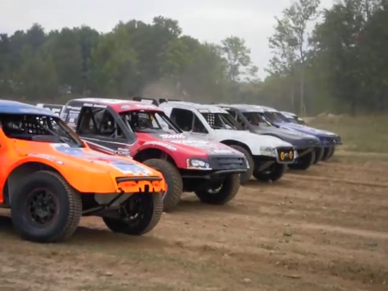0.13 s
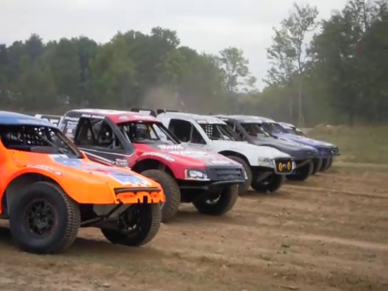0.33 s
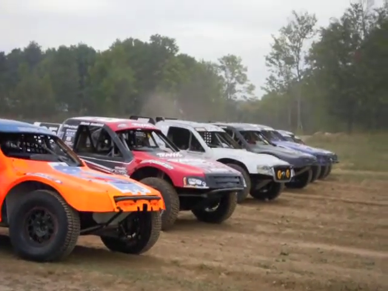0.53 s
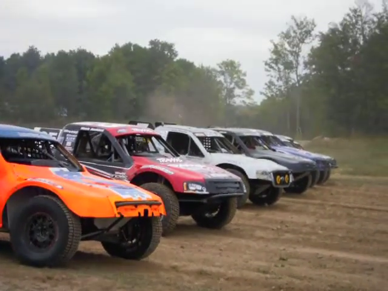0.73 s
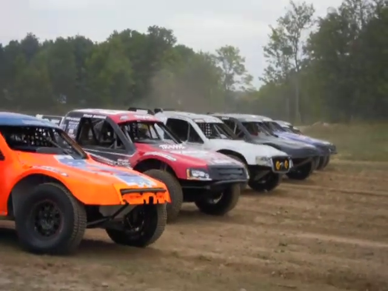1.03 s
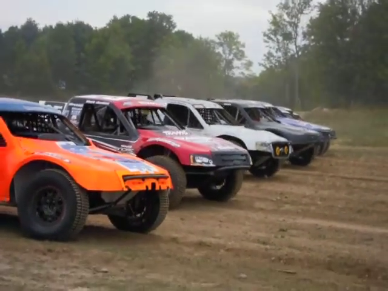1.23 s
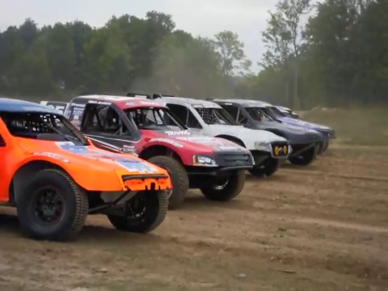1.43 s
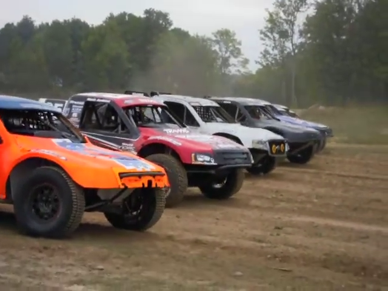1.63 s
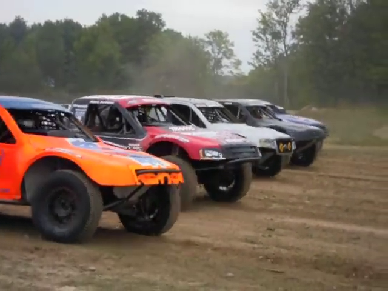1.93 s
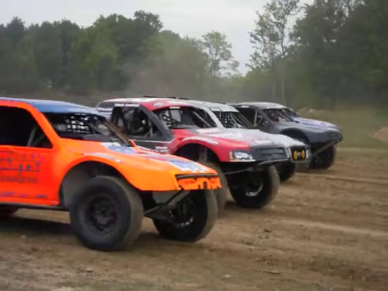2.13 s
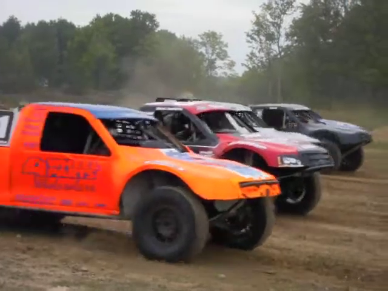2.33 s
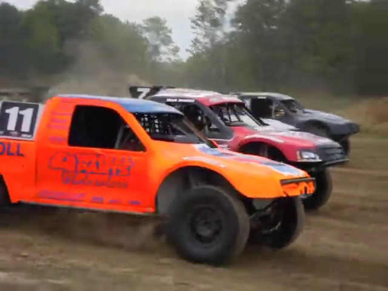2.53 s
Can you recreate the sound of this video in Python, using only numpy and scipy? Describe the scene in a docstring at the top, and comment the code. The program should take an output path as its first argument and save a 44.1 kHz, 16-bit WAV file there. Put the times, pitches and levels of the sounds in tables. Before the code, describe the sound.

A row of V8 off-road trucks drones and beats at held throttle, another engine revving behind; then all accelerate, growing rougher and hissier over dirt, captured close by a distorted, narrow-band microphone outdoors.

```python
"""A steady drone that beats against a second one: V8 race trucks hold their revs on a dirt start line, then launch.
As the throttles open the notes climb, the exhausts rasp and the tyres tear at the dirt; the field roars behind.
Exhausts are sums of crank-rate partials, rasp is gated buzz and hiss, and dirt, roar and rumble are shaped noise.
An overdriven, narrow-band recorder flattens the peaks of the sum."""
import sys
import numpy as np
from scipy import signal
from scipy.fft import rfft, irfft, next_fast_len
from scipy.io import wavfile
from scipy.ndimage import uniform_filter1d, map_coordinates

SR = 44100
rng = np.random.default_rng(int(sys.argv[2]) if len(sys.argv) > 2 else 0)


def int16_out(signal):
    """Quantize to a 16-bit WAV file."""
    q = np.round(np.clip(np.atleast_2d(signal).T, -1, 1) * 32767)
    wavfile.write(sys.argv[1], SR, q.astype(np.int16))


N = 117747  # length in samples

# Launch: throttles open [s], time to take up the load [s], full speed [s]
LAUNCH_S, LOAD_S, FULL_S = 1.66, .3, 2.67

# Firing rate of the nearest engine: t/s, f/Hz
NEAR_FIRING = [(0, 206), (.67, 204.8), (1.15, 201), (1.62, 198), (1.72, 211), (1.82, 215), (1.97, 241),
               (2.1, 247), (2.2, 256), (2.44, 291), (2.67, 326)]
# Nearest exhaust at held revs, in unbroken order: multiple of the crank rate, level/dB
HELD_PARTIALS = [(1, -29), (2, -36), (3, -37), (4, -11), (5, -38), (6, -39), (7, -25), (8, -24.5),
                 (9, -28.5), (10, -41), (11, -28), (12, -40), (13, -35), (14, -52), (15, -35), (16, -30.5),
                 (17, -39), (18, -50), (19, -34), (20, -40), (21, -43), (22, -47), (23, -41), (24, -50)]
# Nearest exhaust under load: multiple of the crank rate, level/dB
LOADED_PARTIALS = [(1, -23), (2, -28), (3, -18), (4, -12), (5, -25), (6, -29), (7, -25), (8, -23), (9, -38),
                   (10, -37), (11, -33), (12, -32), (13, -36), (14, -36), (15, -41), (16, -42)]
# Gain of the nearest engine's firing note: t/s, level/dB
NEAR_NOTE_GAIN = [(0, 0), (.55, -.5), (1.1, 2), (1.5, 3), (1.69, 3), (1.76, -2.5), (1.88, -2), (2, 4),
                  (2.2, 2), (2.33, -1), (2.44, 3.5), (2.67, 3)]
# Gain of its partials around the firing note: t/s, level/dB
OVERTONE_GAIN = [(0, 2), (.8, 2.5), (1.6, 1), (1.8, 1), (2.2, 2), (2.67, 3.5)]
# Lines from uneven cylinders, between the crank multiples: f/Hz, level/dB
UNEVEN_LINES = [(25, -42), (130, -34), (300, -43), (430, -40), (700, -51), (1300, -48), (2000, -54)]
ROUGH_HELD, ROUGH_LOADED = .22, .55  # flutter depth of the nearest engine's overtones

# Exhaust rasp: t/s, level/dB
RASP_LEVEL = [(0, -24.7), (.7, -24.9), (1.25, -27.3), (1.63, -28.3), (1.72, -25.3), (2.1, -23.5),
              (2.3, -19.3), (2.52, -19.3), (2.65, -15.8)]
# Colour of the rasp: f/Hz, level/dB
RASP_COLOUR = [(200, -20), (500, -8), (1000, -2.5), (1300, -1.5), (1550, .5), (1900, -5.5), (2500, 0),
               (3000, -2.5), (3450, -2), (3800, -8.5), (4600, -12)]
# Strength of each exhaust puff, in firing order: level/dB
PUFF_STRENGTH = [2.5, 0, -1, -1.5, 2, .5, -2, -.5]

# Dirt thrown by the spinning tyres: t/s, level/dB
DIRT_LEVEL = [(1.6, -60), (1.72, -32), (2.1, -26), (2.3, -20), (2.52, -19), (2.65, -14.5)]
# Colour of the dirt spray: f/Hz, level/dB
DIRT_COLOUR = [(700, -16), (1400, -10), (2000, -2), (2600, 0), (3500, 0), (4600, -7)]

# Firing rate of the neighbouring engine: t/s, f/Hz
NEIGHBOUR_FIRING = [(0, 185.9), (.14, 190), (.3, 195.4), (.48, 190.2), (.8, 196), (1.17, 192.7),
                    (1.35, 196.5), (1.48, 197.2), (1.6, 186.7), (1.75, 204.5), (1.9, 232), (2.2, 244),
                    (2.67, 312)]
# Level of the neighbour: t/s, level/dB
NEIGHBOUR_LEVEL = [(0, -15), (.3, -16.5), (.42, -22), (.65, -18), (1.1, -19), (1.35, -24), (1.6, -19),
                   (1.72, -19), (2, -24), (2.67, -25)]
NEIGHBOUR_LAG = .56  # firing periods behind the nearest truck, in starting phase
# A third truck that revs up hard: t/s, firing rate f/Hz, level/dB
THIRD_TRUCK = [(0, 255, -40), (.55, 258, -33), (.75, 278, -26), (1.2, 295, -24), (1.45, 300, -26),
               (1.7, 245, -25), (1.87, 250, -19), (2.1, 302, -19), (2.33, 372, -18), (2.45, 388, -21),
               (2.67, 420, -17)]
# Exhaust of the neighbour and third truck: multiple of the crank rate, level/dB
OTHER_PARTIALS = [(1, -17), (2, -17), (3, -16), (4, 0), (5, -17), (6, -20), (7, -19), (8, -17), (9, -22),
                  (12, -24), (16, -27), (22, -33)]

# Trucks further down the row: firing rate held f/Hz, firing rate at full speed f/Hz, level/dB
FAR_ENGINES = [(218, 290, -37), (236, 262, -32), (172, 245, -37)]
# Colour of the far exhausts: f/Hz, level/dB
FAR_COLOUR = [(40, -14), (150, -8), (300, -10), (470, 1), (580, -5), (700, -17), (860, -4), (1100, -12),
              (1400, -13), (2000, -20)]
FIELD_SURGE_DB = 6  # gain of the far trucks at full load

# Roar of the whole field: t/s, level/dB
ROAR_LEVEL = [(0, -30), (1.62, -29), (1.72, -19), (2.3, -16.5), (2.67, -18.5)]
# Colour of the roar: f/Hz, level/dB
ROAR_COLOUR = [(40, -15), (105, 3.5), (160, 2), (280, -2), (380, 1), (480, 1), (590, 0), (690, -11),
               (830, -2), (980, -5), (1250, -20), (2500, -28), (4500, -40)]
# Low rumble: t/s, level/dB
RUMBLE_LEVEL = [(0, -25), (.8, -23), (1.15, -24), (1.4, -21), (1.62, -26), (1.72, -17), (1.92, -15.5),
                (2.05, -21), (2.3, -17), (2.67, -29)]
# Colour of the rumble: f/Hz, level/dB
RUMBLE_COLOUR = [(12, -26), (25, -10), (40, -9), (57, 0), (75, -4), (110, -5), (150, -9), (220, -30)]

# Treble response of the recorder: f/Hz, level/dB
RECORDER_TREBLE = [(3700, 0), (3850, -4), (4050, -18), (4350, -16), (4600, -38), (4800, -68)]
TOP_HZ = 4829  # band limit
CLIP_TOP, CLIP_KNEE = .63, 7  # limiting amplitude before the treble filter; sharpness of the bend


def near_exhaust():
    """Harmonic series: a strong firing note among weaker crank multiples, rebalanced as load is taken up."""
    rate, turns = crank(curve(NEAR_FIRING))
    load = engine_load()
    rough = ROUGH_HELD + (ROUGH_LOADED - ROUGH_HELD) * load
    note, rest = np.zeros(N), np.zeros(N)
    for k in range(1, len(HELD_PARTIALS) + 1):
        held_db = HELD_PARTIALS[k - 1][1]
        loaded_db = np.interp(k, *np.transpose(LOADED_PARTIALS))
        gain = amp((1 - load) * held_db + load * loaded_db)
        if k == 4:  # the firing note
            note = gain * line(k * turns, rough=.1, flutter_rate=38, start=0)
        else:
            depth = rough * (1 if k > 4 else .5)
            rest += gain * line(k * turns, rough=depth, flutter_rate=17)
    # unequal cylinders repeat only every two turns: half-odd multiples
    for k in range(1, 30):
        gain = amp(along(UNEVEN_LINES, (k + .5) * rate))
        rest += gain * line((k + .5) * turns, rough=2 * rough, flutter_rate=19)
    return amp(curve(NEAR_NOTE_GAIN)) * note + amp(curve(OVERTONE_GAIN)) * rest


def rasp(puff_db, flicker_db, buzz_held, buzz_loaded):
    """Amplitude modulation: each firing gates a puff of hiss and of buzz periodic in the engine cycle."""
    firings = np.cumsum(curve(NEAR_FIRING)) / SR
    count = len(PUFF_STRENGTH)
    sizes_db = np.interp(firings, np.arange(count), PUFF_STRENGTH, period=count)
    pulse_db = puff_db * np.cos(2 * np.pi * firings)
    gate = amp(sizes_db + pulse_db + flicker_db * wobble(90))

    # one engine cycle of buzz as a wavetable, with random partials
    size = 4096
    partials = amp(3 * rng.standard_normal(170)) * np.exp(2j * np.pi * rng.random(170))
    partials[1::2] *= amp(-4)  # weaken the odd ones
    cycle = irfft(partials, size)
    buzz = unit(np.interp(firings / count * size, np.arange(size), cycle, period=size))

    # power share of the buzz; hiss takes the remainder
    share = np.clip(buzz_held + (buzz_loaded - buzz_held) * engine_load(), 0, 1)
    source = np.sqrt(share) * buzz + np.sqrt(1 - share) * rng.standard_normal(N)
    puffs = patchy(gate * source, depth_db=1.2)
    return amp(curve(RASP_LEVEL)) * unit(coloured(puffs, RASP_COLOUR))


def dirt():
    """Broadband noise of many impacts: the tyres bite and spray dirt ever harder."""
    return amp(curve(DIRT_LEVEL) + 1.2 * wobble(35)) * noise(DIRT_COLOUR)


def other_exhaust(firing_hz, lag):
    """Beating: a firing note close to the nearest one, with plainer overtones; lag in firing periods."""
    turns = crank(firing_hz)[1]
    out = np.zeros(N)
    for k in range(1, 23):
        if k == 4:  # the firing note
            part = line(k * turns, rough=.25, flutter_rate=25, start=-lag)
        else:
            part = line(k * turns, rough=.3 + .5 * engine_load(), flutter_rate=18)
        out += amp(np.interp(k, *np.transpose(OTHER_PARTIALS))) * part
    return out


def neighbour():
    """Superposition: the next truck's partials beat with the nearest truck's."""
    return amp(curve(NEIGHBOUR_LEVEL)) * other_exhaust(curve(NEIGHBOUR_FIRING), NEIGHBOUR_LAG)


def third_truck():
    """Pitch follows firing rate: a third engine revs up hard from a random phase."""
    return amp(curve(THIRD_TRUCK, axis=2)) * other_exhaust(curve(THIRD_TRUCK), rng.random())


def far_trucks():
    """Frequency modulation: each far engine hunts about a held rate that climbs after the launch."""
    climb = np.clip((np.arange(N) / SR - LAUNCH_S) / (FULL_S - LAUNCH_S), 0, 1)
    out = np.zeros(N)
    for held_hz, full_hz, db in FAR_ENGINES:
        steady_hz = held_hz + (full_hz - held_hz) * climb
        rate, turns = crank(steady_hz * (1 + .012 * wobble(2.5)))
        for k in range(3, 21):
            weak_db = -7 * (k % 4 > 0)  # all but multiples of the firing rate
            gain = amp(db + weak_db + along(FAR_COLOUR, k * rate))
            out += gain * line(k * turns, rough=.5, flutter_rate=14)
    return amp(FIELD_SURGE_DB * engine_load()) * out


def roar():
    """Incoherent summation: the whole field merges into fluctuating coloured noise."""
    return amp(curve(ROAR_LEVEL) + .8 * wobble(22)) * noise(ROAR_COLOUR)


def rumble():
    """Low-frequency random excitation: noise with its energy at the bottom of the range."""
    return amp(curve(RUMBLE_LEVEL) + 2 * wobble(16)) * noise(RUMBLE_COLOUR)


def engine_load():
    """Linear transition: 0 while the revs are held, 1 once the load is taken up."""
    return np.clip((np.arange(N) / SR - LAUNCH_S) / LOAD_S, 0, 1)


def crank(firing_hz):
    """Four-stroke kinematics: a V8 fires four times a turn; gives crank rate in Hz and turns."""
    rate = firing_hz / 4
    return rate, np.cumsum(rate) / SR


def line(turns, rough, flutter_rate, start=None):
    """Quadrature modulation: one partial of nominal rms 1, fluttering in size and phase."""
    angle = 2 * np.pi * (turns + (rng.random() if start is None else start))
    in_phase = rough * wobble(flutter_rate)
    quadrature = rough * wobble(flutter_rate)
    partial = (1 + in_phase) * np.sin(angle) + quadrature * np.cos(angle)
    return partial / np.sqrt(.5 + rough ** 2)


def patchy(x, depth_db):
    """Time-frequency modulation: brief random swells, each a few hundred Hz wide."""
    z = signal.stft(x, nperseg=512)[2]
    field = uniform_filter1d(rng.standard_normal(z.shape), size=7, axis=0)
    field = uniform_filter1d(field, size=7, axis=1)
    return signal.istft(z * amp(depth_db * unit(field)), nperseg=512)[1][:N]


def noise(points):
    """Spectral shaping: coloured noise of rms 1."""
    return unit(coloured(rng.standard_normal(N), points))


def coloured(x, points):
    """Linear filtering: x through an (f/Hz, level/dB) curve, with nothing above the band limit."""
    m = next_fast_len(N + SR // 4)
    hz = np.fft.rfftfreq(m, 1 / SR)
    return irfft(rfft(x, m) * amp(along(points, hz)) * (hz < TOP_HZ), m)[:N]


def wobble(rate):
    """Band-limited fluctuation: a smooth random curve with rate knots a second."""
    at = np.arange(0, N + 64, 64)  # evaluated every 64 samples
    knots = rng.standard_normal(512)
    smooth = map_coordinates(knots, [at * rate / SR], mode="wrap")
    return np.interp(np.arange(N), at, smooth)


def curve(rows, axis=1):
    """Linear interpolation: one column of a time table, per sample."""
    rows = np.asarray(rows, float)
    return np.interp(np.arange(N) / SR, rows[:, 0], rows[:, axis])


def along(points, hz):
    """Logarithmic frequency scale: (f/Hz, value) points read at hz."""
    f, v = np.transpose(points)
    return np.interp(np.log(hz + 1), np.log(f + 1), v)


def amp(db):
    """Level to amplitude ratio: 20 dB a decade."""
    return 10 ** (np.asarray(db) / 20)


def unit(x):
    """Power normalisation: scale to rms 1."""
    return x / np.sqrt(np.mean(x ** 2) + 1e-20)


def scene():
    """Superposition: the trucks over the roar and rumble of the field."""
    nearest = near_exhaust() + rasp(puff_db=1.4, flicker_db=.7, buzz_held=.35, buzz_loaded=.1) + dirt()
    others = neighbour() + third_truck() + far_trucks()
    return (nearest + others + roar() + rumble())[None]


def record(dry):
    """Saturation, then band limiting: the overdriven recorder flattens peaks and cuts the treble."""
    flat = dry[0] / (1 + np.abs(dry[0] / CLIP_TOP) ** CLIP_KNEE) ** (1 / CLIP_KNEE)
    return coloured(flat, RECORDER_TREBLE)[None]


dry = scene()
out = record(dry)
int16_out(out)
```